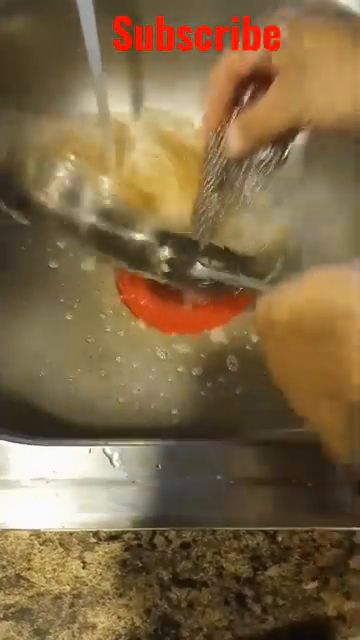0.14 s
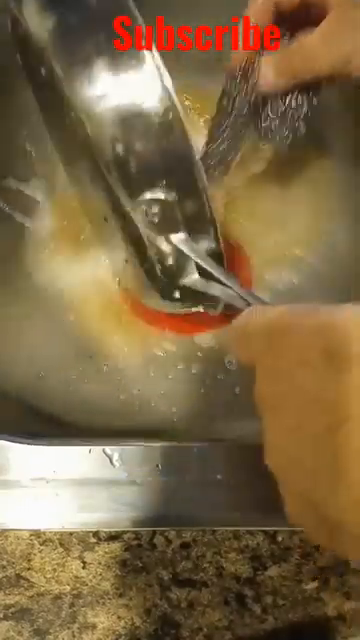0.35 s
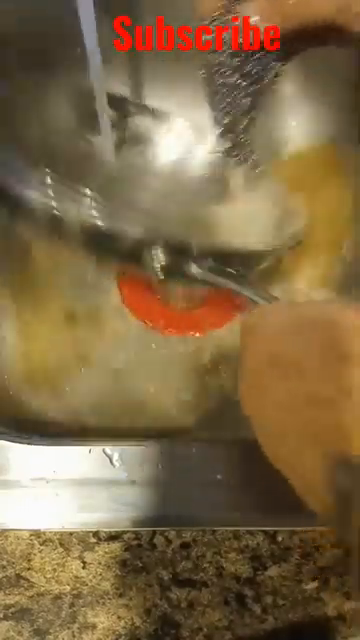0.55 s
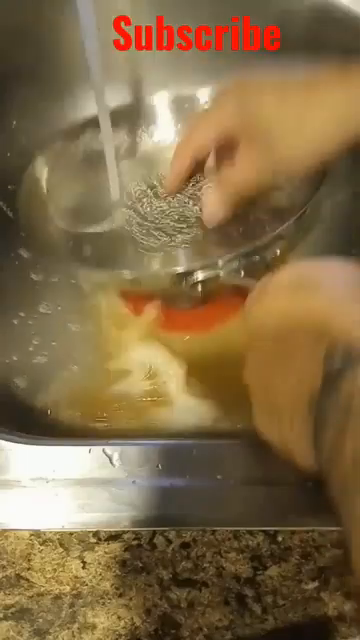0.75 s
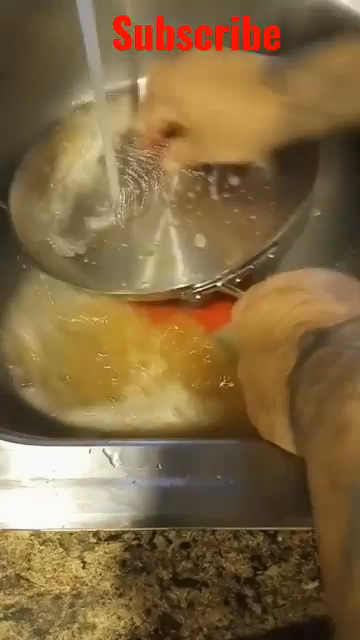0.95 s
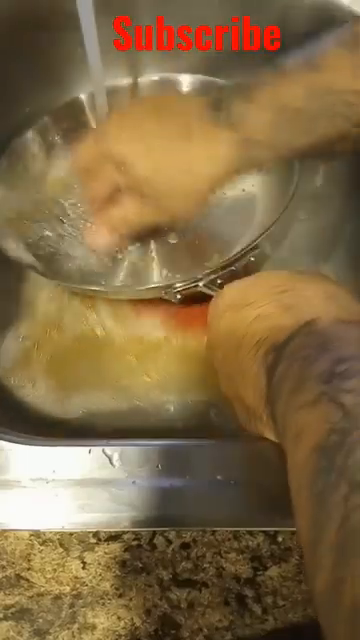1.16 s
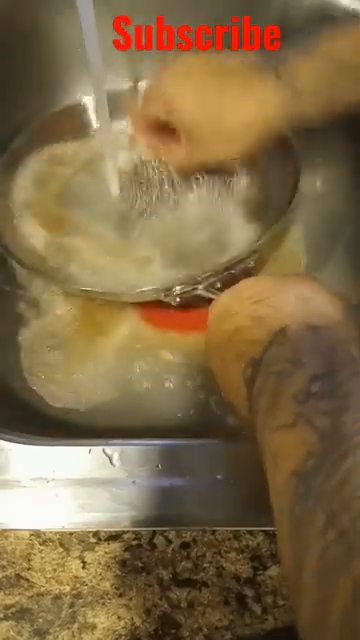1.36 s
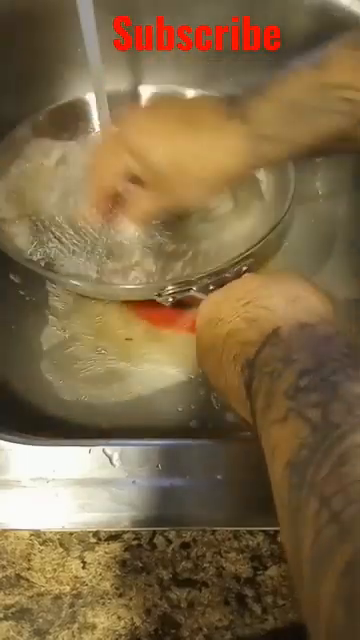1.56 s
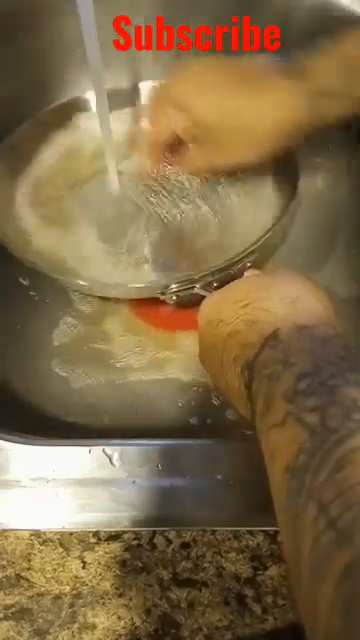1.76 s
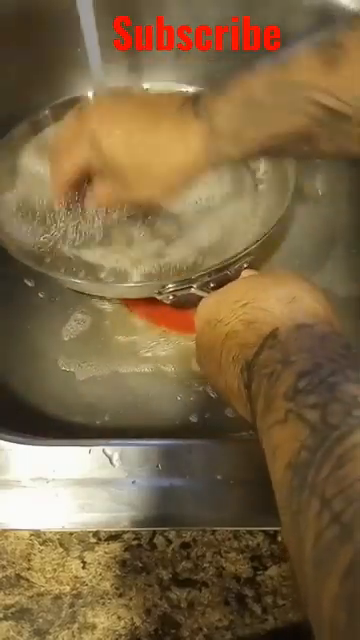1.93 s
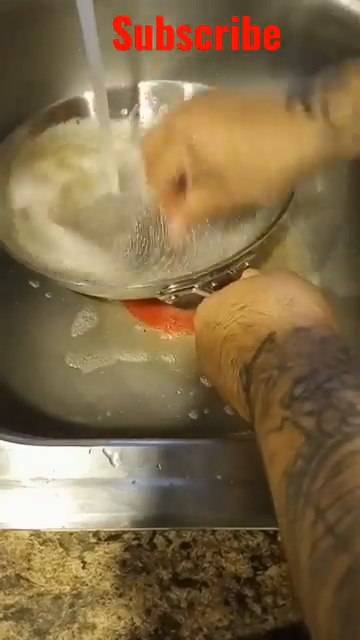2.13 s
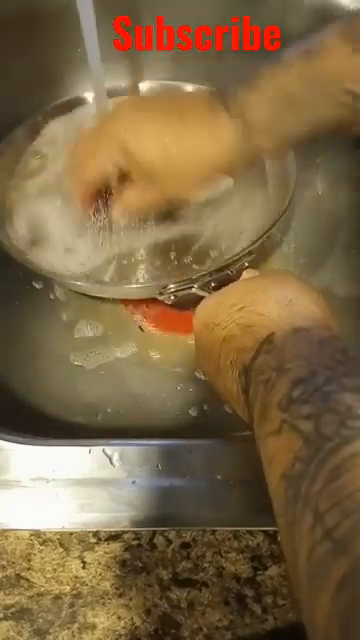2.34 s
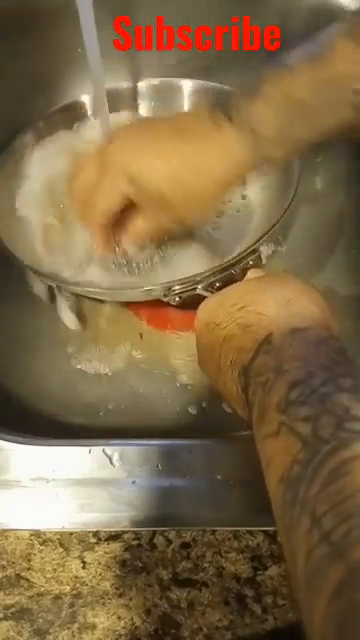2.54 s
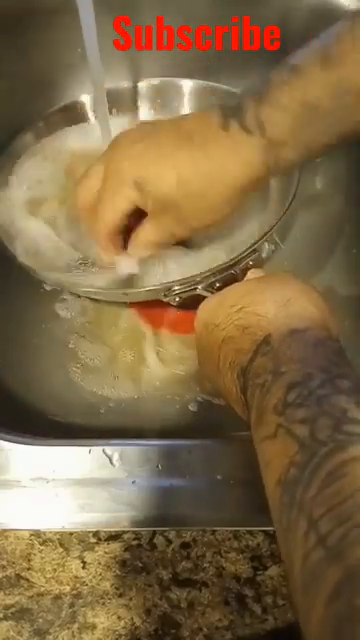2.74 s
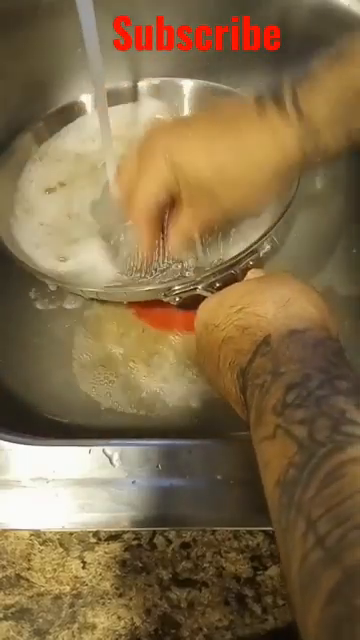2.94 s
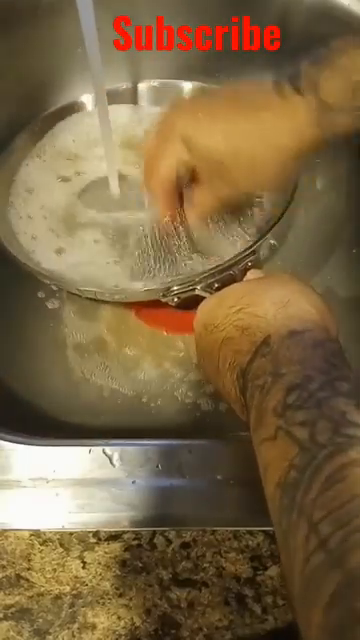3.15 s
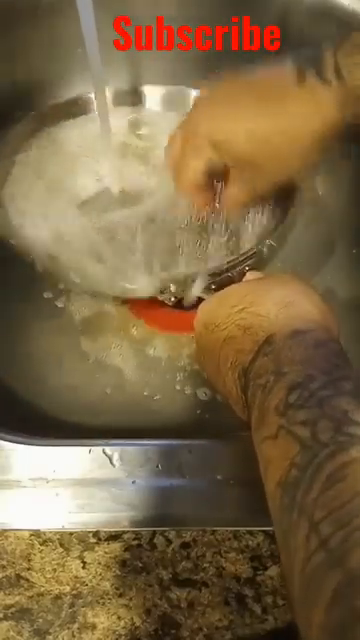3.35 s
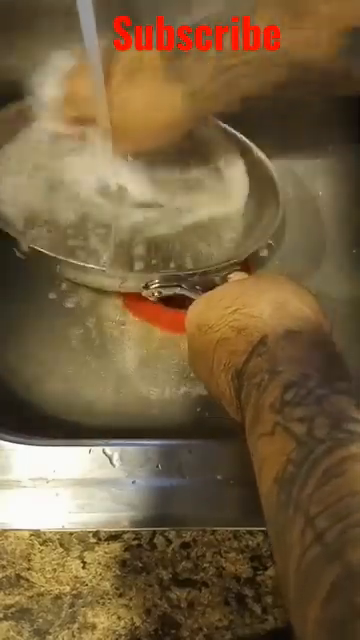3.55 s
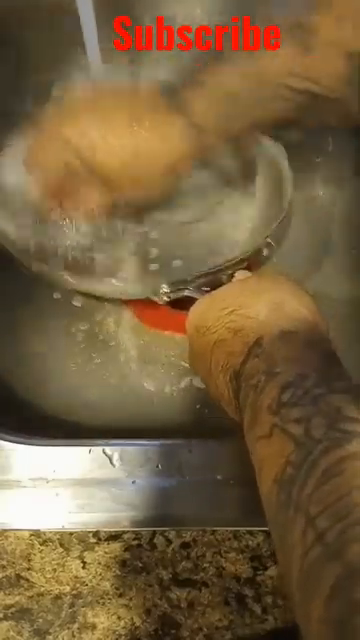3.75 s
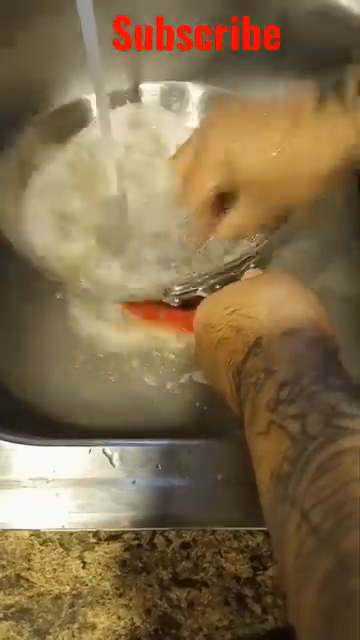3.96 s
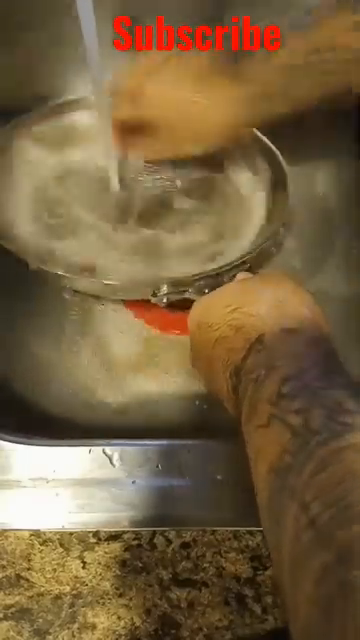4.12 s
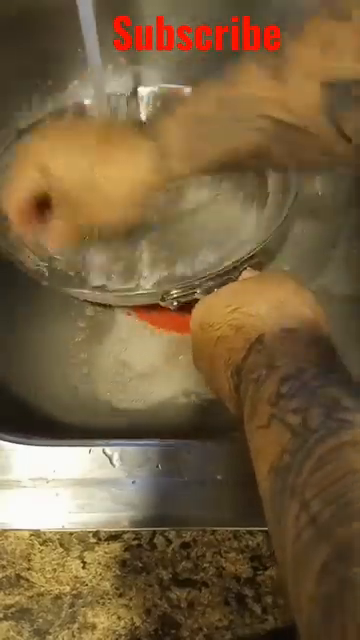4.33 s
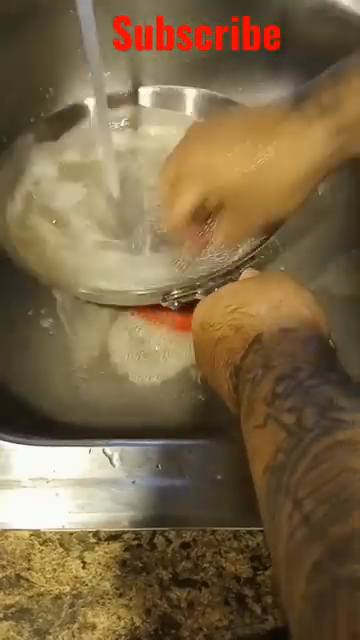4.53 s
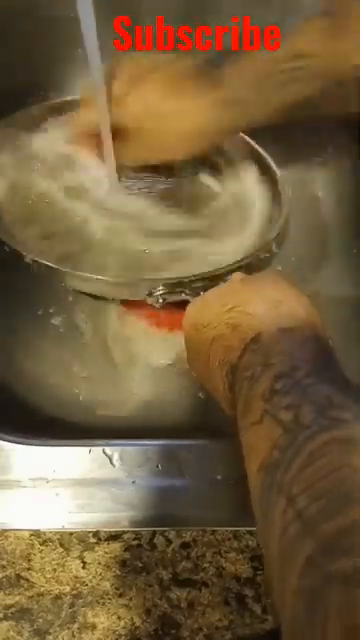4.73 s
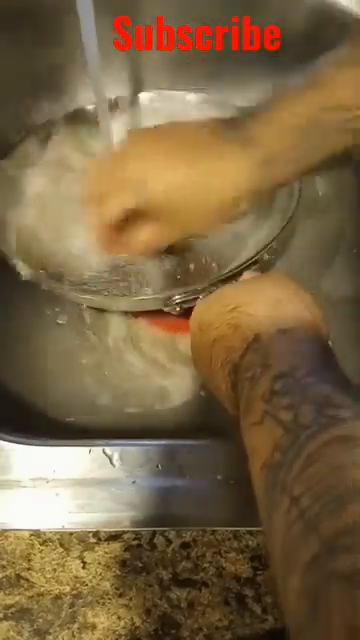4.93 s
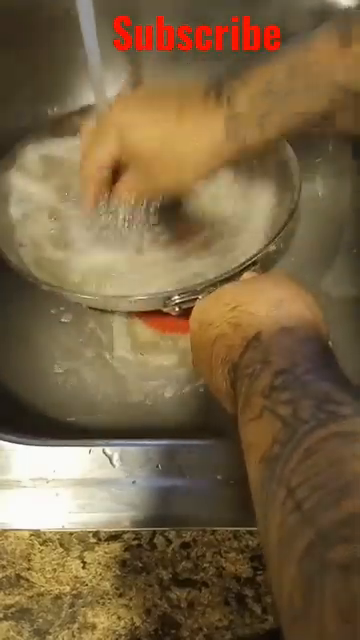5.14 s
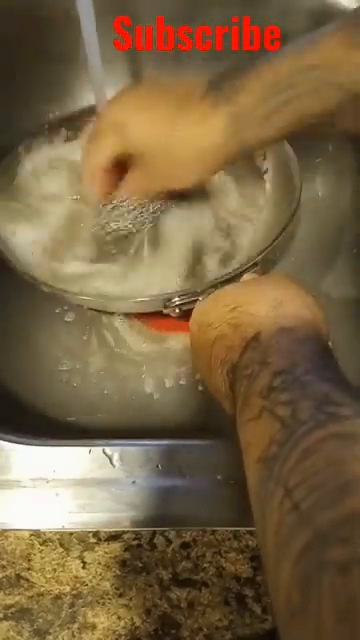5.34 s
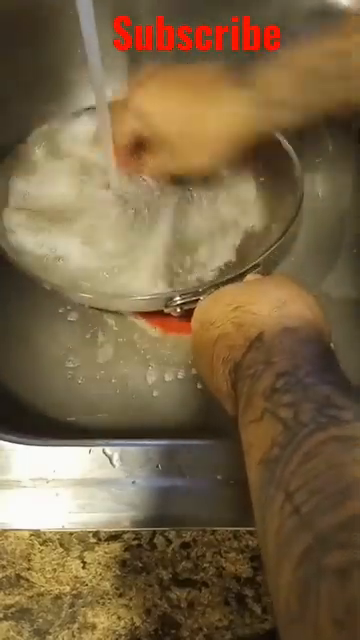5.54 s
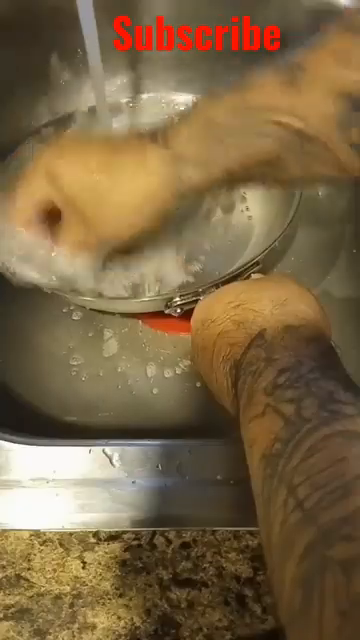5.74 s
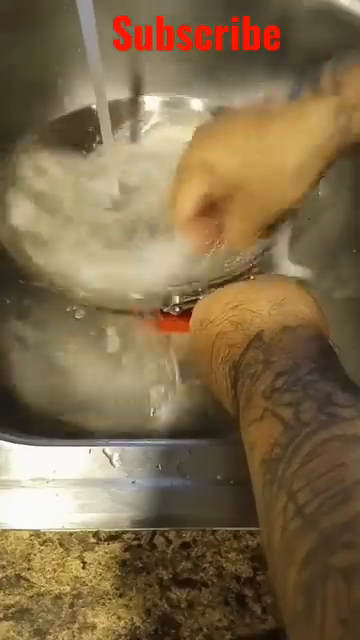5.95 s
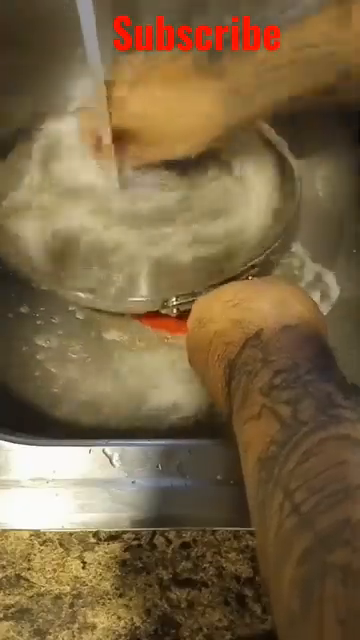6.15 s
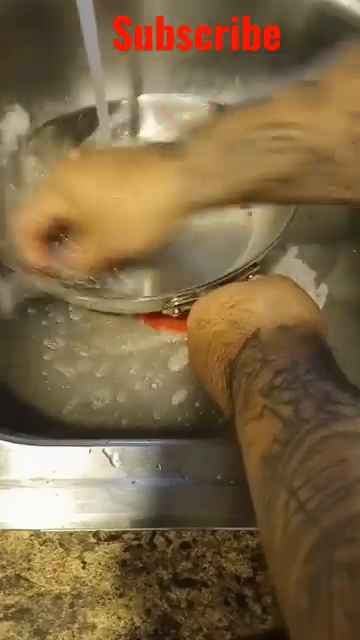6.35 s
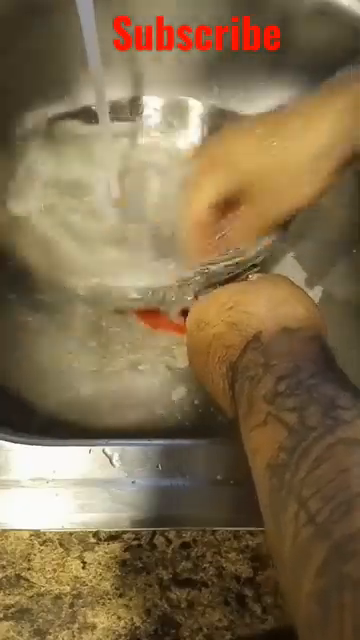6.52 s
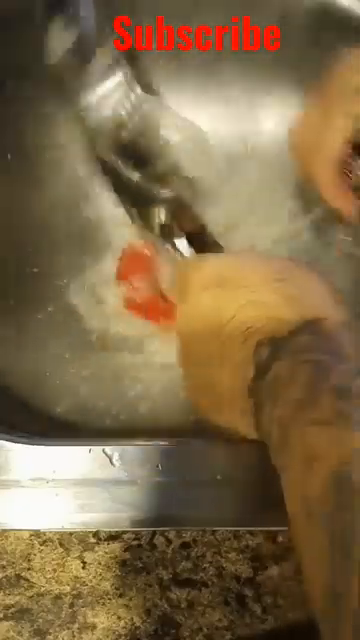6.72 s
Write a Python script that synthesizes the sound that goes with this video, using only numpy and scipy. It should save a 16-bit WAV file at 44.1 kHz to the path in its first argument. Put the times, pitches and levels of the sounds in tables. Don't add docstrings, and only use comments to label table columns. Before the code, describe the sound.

Metal links scrape briskly round a wet steel pan, ringing and hissing, while the pan knocks and skids on a hollow sink under running water.

```python
import sys
import numpy as np
from scipy import signal
from scipy.fft import rfft, irfft
from scipy.io import wavfile
from scipy.ndimage import uniform_filter1d

SR = 44100
rng = np.random.default_rng(int(sys.argv[2]) if len(sys.argv) > 2 else 0)


def int16_out(signal):
    q = np.round(np.clip(np.atleast_2d(signal).T, -1, 1) * 32767)
    wavfile.write(sys.argv[1], SR, q.astype(np.int16))


def amplitude_ratio(level_db):
    exponent = np.asarray(level_db, float) / 20
    return 10 ** exponent


N = 303614

# (t/s, thump level/dB, thump f/Hz, boom level/dB, clank level/dB)
KNOCKS = [(0.091, -33.5, 271, -33.5, -56), (0.326, -57, 204, -25.5, -56.5), (0.855, -18, 207, -17.5, -27),
          (1.094, -27, 267, -49, -42), (1.126, -19.5, 251, -34, -22.5), (1.628, -31.5, 280, -29, -44),
          (2.010, -31, 337, -27, -41), (2.574, -26, 290, -53, -69), (3.434, -48, 215, -45, -62),
          (3.568, -25.5, 308, -50, -41), (3.695, -24.5, 281, -26.5, -27), (3.99, -42, 290, -30.5, -48),
          (4.319, -28, 249, -25, -26.5), (4.519, -44, 263, -40, -44.5), (4.794, -29.5, 270, -53, -44),
          (4.88, -19, 276, -19, -23.5), (5.045, -16, 310, -36, -39), (5.3, -20.5, 239, -32, -39.5),
          (5.328, -24.5, 211, -39, -44.5), (5.8, -33, 270.3, -39, -54.5), (6.348, -12.5, 299, -16, -38),
          (6.404, -16, 306, -19.5, -30), (6.423, -17, 279, -24, -50)]
# (f/Hz, level/dB, t60/s)
FLOOR_MODES = [(203.4, -5.5, 0.4), (263.3, -6.5, 0.73), (278.3, 4.5, 0.28)]
BOOM_MODES = [(119.1, -4.5, 0.42), (130.7, 3.5, 0.27), (152.4, -3, 0.4)]
CLANK_MODES = [(505, -0.5, 0.3), (612.5, 1.5, 0.36), (705, 5.5, 0.17), (858, 8, 0.1), (947, -3.5, 0.24),
               (1210, -1, 0.056), (1313, 2, 0.16), (1504, 6, 0.045), (1850, -9, 0.11), (2286, -3, 0.2),
               (3023, 3, 0.032)]
# (f/Hz, level/dB, t60/s)
PAN_LOW = [(735, -4.5, 0.084), (876, -12.5, 0.38), (1194, 3.5, 0.071), (1306, -12, 0.17),
           (1415, -14.5, 0.095), (1765, 3, 0.13), (1890, 1, 0.13), (2217, -1, 0.054), (2523, 0, 0.076),
           (2760, -2.5, 0.15)]
PAN_HIGH = [(3164, -3, 0.14), (3914, -3, 0.043), (4130, -6.5, 0.18), (4460, 1.5, 0.027), (5025, 0, 0.067),
            (5390, -4, 0.11), (5800, -18, 0.21), (6010, -3, 0.093), (6160, -6, 0.05), (6480, -5, 0.044)]


def evened(x):
    return x / np.sqrt(np.mean(x ** 2) + 1e-20)


def read(points, hz):
    f, value = np.transpose(points)
    return np.interp(np.log(hz + 1), np.log(f + 1), value)


def controls(rows):
    s, *columns = np.transpose(rows)
    return [np.interp(np.arange(N) / SR, s, c) for c in columns]


def peaks_db(rows):
    t, out = np.arange(0, N, 32) / SR, 0
    for s, db, rise, fall in rows:
        growth = 1 + (t - s) / max(rise, .005)
        decay = 1 - (t - s) / max(fall, .005)
        out = np.maximum(out, db * np.minimum(growth, decay))
    return np.interp(np.arange(N) / SR, t, out)


def add(mix, s, sound):
    part = mix[round(s * SR):][:len(sound)]
    part += sound[:len(part)]


def ring(modes, gains, size=20000):
    t = np.arange(size) / SR
    return sum(g * amplitude_ratio(db - 60 * t / t60) * np.sin(2 * np.pi * hz * t)
               for g, (hz, db, t60) in zip(gains, modes))


def hiss(spectrum, patchy_db, flicker_db):
    frames, hz = N // 128 + 5, np.fft.rfftfreq(512, 1 / SR)
    a, b, c, d, patches = rng.standard_normal((frames, 257, 5)).T
    patches = uniform_filter1d(patches, size=6, axis=0)
    patches = evened(uniform_filter1d(patches, size=16, axis=1))
    flicker = evened(uniform_filter1d(rng.standard_normal(frames), size=4))
    level_db = read(spectrum, hz)[:, None] + patchy_db * patches + flicker_db * flicker
    z = np.array([a + 1j * b, c + 1j * d]) * amplitude_ratio(level_db)
    return evened(signal.istft(z, nperseg=512, noverlap=384)[1][:, :N])


def ticks(per_s, spread_db):
    sign = rng.choice([-1., 1.], N) * (rng.random(N) < per_s / SR)
    return sign * amplitude_ratio(spread_db * np.minimum(rng.exponential(1, N), 5))


def excited(modes, per_s, spread_db, roam_db, wander):
    out, frames = np.zeros((2, N)), N // 1000 + 2
    at = np.arange(N) / 1000
    roam = evened(uniform_filter1d(rng.standard_normal((frames, len(modes))), size=5, axis=0))
    contacts = np.array([ticks(per_s, spread_db) for port in out])
    signs = rng.choice([-1, 1], (len(modes), 2, 1))
    for (hz, db, t60), r, sign in zip(modes, roam.T, signs):
        sag = np.interp(at, np.arange(frames), wander * r[::-1])
        turn = np.exp(2j * np.pi * hz * np.cumsum(1 + sag) / SR)
        drive = contacts * np.interp(at, np.arange(frames), amplitude_ratio(db + roam_db * r))
        decayed = signal.lfilter([1], [1, -amplitude_ratio(-60 / t60 / SR)], drive * turn.conj() + 1e-18)
        out += sign * (turn * decayed).imag
    return evened(out)


def scrub():
    # (t/s, scratch level/dB, pan ring share/dB)
    contact = [(0.0, -56, -2.5), (.4, -59, 2.5), (.5, -56, -5), (.835, -58.5, -3.5), (.86, -42.5, 6.5),
               (1.4, -47, 1.5), (1.86, -46, -1.5), (2.22, -46.5, -6.5), (2.4, -42, -7), (3.05, -43, -7),
               (3.33, -45.5, -11), (3.85, -49.5, -2.5), (4.44, -47, -7.5), (4.7, -46, -10),
               (5.17, -47, -3.5), (5.6, -46.5, -7), (6.4, -48.5, -9), (6.88, -45, -9.5)]
    # (hardest t/s, extra pressure level/dB, rise/s, fall/s)
    strokes = [(0.0, 3.5, .05, 0.12), (.15, 3, .06, 0.024), (.31, 5, 0.13, 0.14), (.88, 18, 0.056, 0.18),
               (1.09, 6, 0.13, 0.031), (1.3, 6.5, 0.037, 0.085), (1.53, 8, .06, 0.17),
               (1.88, 0, 0.023, 0.09), (2.1, 3.5, 0.22, 0.13), (2.83, 3.5, 0.069, .05),
               (3.2, 4, 0.045, 0.08), (3.37, 3.5, 0.024, 0.11), (3.455, 5.5, .1, 0.028),
               (3.56, 2.5, .07, .1), (3.7, 4, 0.082, .05), (3.97, 3.5, .1, .09), (4.29, 3.5, 0.18, 0.12),
               (4.81, 2, 0.08, .06), (4.88, 6, 0.008, 0.045), (5.07, 3.5, .08, .09), (5.26, 5, 0.076, 0.14),
               (5.495, 2.5, 0.082, 0.15), (5.7, 8, 0.094, 0.13), (6.07, 6.5, .11, 0.076),
               (6.3, 7, 0.13, 0.044), (6.73, 5, 0.21, 0.099)]
    # (t/s, low rings level/dB, high rings level/dB)
    choke = [
        (0, -2, -12),
        (.8, -14, -10),
        (.9, -0.5, -3),
        (1.3, 2.5, -1.5),
        (1.8, 0, -6),
        (2.4, -2, -5.5),
        (3.3, -2.5, -8.5),
        (4.5, -6, -8),
        (6.88, -10.5, -8.5),
    ]
    # (f/Hz, level/dB per Hz)
    scratch_spectrum = [(1290, -77), (2200, -11), (2530, -6), (3360, -3.5), (3570, 0), (4280, -5),
                        (4650, 1), (5990, 1.5), (7190, -6.5), (9000, -10.5), (11700, -30), (19800, -120)]
    spray_spectrum = [(4120, -38), (7000, 0.5), (8380, -1.5), (10600, 3.5), (13500, 1), (14900, 8.5),
                      (15800, -0.5)]
    wash_spectrum = [(410, -7), (700, -1), (987, -3.5), (1570, 3), (1760, 3), (2100, 2), (3500, -8),
                     (4550, -0.5), (7700, -120)]
    ring_follow, spray_follow, spray_db = 0.28, 0.7, -0.22

    (rest_db, ring_db), press_db = controls(contact), peaks_db(strokes)
    low_db, high_db = controls(choke)
    scratch = amplitude_ratio(high_db) * excited(PAN_HIGH, 1200, 3.0, 3.5, .006) + hiss(scratch_spectrum, 2.2, 0.36)
    rings = amplitude_ratio(low_db) * excited(PAN_LOW, 600, 2.9, 4.3, .008) + hiss(wash_spectrum, 4.36, 0.65)
    scratch /= np.sqrt(1 + amplitude_ratio(2 * high_db))
    rings /= np.sqrt(1 + amplitude_ratio(2 * low_db))
    slips = uniform_filter1d(uniform_filter1d(rng.standard_normal(N), size=400), size=200)
    slips_db = 0.98 * evened(slips)
    spray = amplitude_ratio(spray_db + spray_follow * press_db) * hiss(spray_spectrum, 1.66, 0.44)
    ringing = amplitude_ratio(rest_db + ring_db + ring_follow * press_db) + shaken()
    return amplitude_ratio(3.0 + slips_db) * (amplitude_ratio(rest_db) * (amplitude_ratio(press_db) * scratch + spray) + ringing * rings)


def shaken():
    shaken_db, shaken_t60_s = -14, 0.2
    out, t = np.zeros(N), np.arange(20000) / SR
    for row in KNOCKS:
        dying = amplitude_ratio(row[-1] + shaken_db - 60 * t / shaken_t60_s)
        add(out, row[0], dying * np.minimum(t / 0.0059, 1))
    return out


def knocks():
    thump_t60_s, light_ring, boom_ring = 0.055, 0.63, 0.43
    # (f/Hz, level/dB, t60/s)
    landing_modes = [(153, 5.5, 0.11), (187, 7, 0.061), (274, -2, 0.16), (721, -6, 0.18), (1203, -24, 0.3),
                     (1476, -5, 0.043), (1897, -26, .23), (646, -14, .2), (2830, -24, 0.31)]
    landing_s, landing_db = .8372, -13.5

    out, chance = np.zeros((2, N)), rng.uniform(0.034, 1, (len(KNOCKS), 2, 24))
    signs, detune = rng.choice([-1, 1], (len(KNOCKS), 2, 24)), rng.uniform(-1.044, 1, (len(KNOCKS), 24))
    blow, t = np.hanning(round(0.0013 * SR)), np.arange(20000) / SR
    rattle_band = signal.butter(2, [420 / SR * 2, 1000 / SR * 2], "bandpass")
    for (s, thump_db, hz, boom_db, clank_db), c, sign, d in zip(KNOCKS, chance, signs, detune):
        t60 = thump_t60_s * (amplitude_ratio(-light_ring * (thump_db + 25)) + amplitude_ratio(boom_ring * (boom_db + 13)))
        thump = ring([(hz, 1.5, max(t60, .02))], [1]) + amplitude_ratio(-15.5) * ring(FLOOR_MODES, c[0])
        boom = ring(BOOM_MODES, .5 + .5 * c[0, 4:])
        low = np.convolve(amplitude_ratio(thump_db) * thump + amplitude_ratio(boom_db - 7.5) * boom, blow / blow.sum())
        shifted = [(f * (1 + 0.063 * e), db, decay) for (f, db, decay), e in zip(CLANK_MODES, d)]
        onset = np.minimum(t / .002 * amplitude_ratio(.6 * (clank_db + 25)), 1)
        for port in range(2):
            crack = rng.standard_normal(len(t)) * amplitude_ratio(-9.0 - 60 * t / 0.05)
            rattle = rng.standard_normal(len(t)) * amplitude_ratio(15 - 60 * t / 0.27)
            clank = ring(shifted, (c * sign)[port, 8:]) + signal.lfilter([.3], [1, -.7], crack)
            clank += signal.lfilter(*rattle_band, rattle)
            add(out[port], s, low[:len(clank)] + amplitude_ratio(clank_db - 5.0) * clank * onset)
    landing = np.minimum(t / 0.0055, 1) * ring(landing_modes, np.ones(len(landing_modes)))
    for port in out:
        add(port, landing_s, amplitude_ratio(landing_db) * landing)
    return out


def drag():
    # (loudest t/s, drag level/dB, upper share/dB, build-up/s)
    drags = [(0.0, -51, -14, 0.12), (.76, -54, -16, 0.077), (1.0, -29, -12, 0.27), (1.21, -37, -6, 0.48),
             (2.14, -54, -30, .4), (3.62, -40.5, -12, 0.13), (3.81, -40.5, -1.5, .2),
             (3.949, -40, -1.5, 0.15), (4.22, -38.5, -15.5, 0.051), (4.39, -32, -14, 0.29),
             (4.56, -47, 2, .1), (4.95, -30.5, -10, .25), (5.37, -48, 2, 0.13), (6.07, -53, -12, .08),
             (6.48, -31, -12.5, 0.25), (6.66, -49.5, -25, .1)]
    rest_db, fall_db_per_s = -63.5, 141
    skids = [(s, db - rest_db, rise, (db - rest_db) / fall_db_per_s) for s, db, upper, rise in drags]
    level_db = rest_db + peaks_db(skids)
    upper_db, = controls([(row[0], row[2]) for row in drags])
    murmuring = FLOOR_MODES + BOOM_MODES + [(339, -1.5, 0.089), (347, 10, 0.12), (414, 0, 0.1)]
    low = excited(murmuring, 400, 2.34, 4.3, .012).sum(0)
    return amplitude_ratio(level_db - 4) * (low + amplitude_ratio(upper_db) * excited(CLANK_MODES[:6], 400, 6.8, 2.8, .02))


def slaps():
    # (t/s, peak level/dB)
    bundle_hits = [(1.1273, -16.5), (1.2908, -29), (1.5189, -32.5), (2.2905, -32), (2.7825, -50),
                   (2.822, -32.5), (3.1818, -30.5), (3.355, -37), (3.4294, -52), (3.694, -27),
                   (4.8773, -21)]
    out, modes, t = np.zeros((2, N)), PAN_LOW + PAN_HIGH, np.arange(8000) / SR
    bright = signal.butter(2, [1000 / SR * 2, 3000 / SR * 2], "bandpass")
    for s, db in bundle_hits:
        for port in out:
            strikes = rng.standard_normal(700) * (rng.random(700) < .03) * amplitude_ratio(-60 * t[:700] / 0.041)
            pan = ring(modes, rng.standard_normal(len(modes)), size=len(t)) * amplitude_ratio(-60 * t / .4)
            body = signal.oaconvolve(strikes, pan)[:len(t)]
            crack = signal.lfilter(*bright, rng.standard_normal(len(t)) * amplitude_ratio(-60 * t / 0.09))
            add(port, s, amplitude_ratio(db - 21) * body + amplitude_ratio(db + 2.5) * crack)
    return out


def flecks():
    # (t/s, peak level/dB, f/Hz, left-right level/dB)
    flicks = [(1.2311, -26, 1700, 0.5), (1.2895, -25, 3200, 3.5), (1.5005, -26, 5970, 3.5),
              (1.8662, -33, 4640, -0.5), (2.7811, -30, 5910, 3.0), (3.1842, -27, 3610, 6.0),
              (3.4311, -29, 6160, 4.0), (3.6945, -24, 1920, 0.0), (4.3166, -26, 1500, 1.5),
              (4.8774, -21, 2130, -1.5), (5.0619, -28, 5680, 5.0), (6.0153, -31, 4610, 4.5),
              (6.348, -35, 1730, 1.5), (6.4029, -32, 1650, 2.0), (6.6848, -30, 6100, 5.5)]
    out = np.zeros((2, N))
    for s, db, hz, pan_db in flicks:
        pair = [(hz, 0, .09), (hz * 1.04, -7, .04)]
        for port, side in zip(out, (1, -1)):
            add(port, s, amplitude_ratio(db - 9 + side * pan_db / 2) * ring(pair, [1, side], size=5000))
    return out


def jingles():
    # (t/s, peak level/dB, f/Hz)
    clusters = [
        (0.1303, -37, 5040),
        (0.1497, -45, 4800),
        (0.2344, -37, 5040),
        (0.259, -43, 4820),
        (0.2893, -38, 5920),
        (0.3185, -41.5, 5960),
    ]
    out = np.zeros((2, N))
    for s, db, hz in clusters:
        tone = ring([(hz, 0, .06), (hz * 1.03, -4, .05)], [1, 1], size=3000)
        for port in out:
            strikes = rng.standard_normal(1200) * (rng.random(1200) < .006)
            add(port, s, amplitude_ratio(db - 9) * np.convolve(strikes, tone))
    return out


def wall():
    # (t/s, level/dB, f/Hz, free time/s)
    tones = [(1.635, -18.5, 347, 0.035), (1.695, -31, 335, 0.026), (2.027, -23.5, 338.3, 0.036),
             (2.072, -31, 341, 0.045), (3.569, -26.5, 330, 0.12), (3.7, -15.5, 350, 0.036),
             (3.773, -33, 349, 0.078), (3.942, -36.5, 347, 0.036), (4.184, -32, 333, 0.081),
             (4.316, -18.5, 359.6, 0.026), (4.344, -20, 340, 0.022), (4.395, -23, 339, 0.023),
             (4.794, -32, 333.4, 0.086), (4.882, -15, 361, 0.079), (6.349, -20.5, 328.5, 0.038),
             (6.402, -25, 315.6, 0.092), (6.424, -25, 328, 0.055)]
    out, t = np.zeros(N), np.arange(20000) / SR
    for s, db, hz, free in tones:
        settled = np.clip((t - free) / 0.011, 0, 1)
        shape = (1 - np.exp(-t / .007)) * amplitude_ratio(-22 * settled)
        add(out, s, amplitude_ratio(db - 1.5) * shape * ring([(hz, 0, .45), (hz - 14, -9, .3)], [1, -1]))
    return out


def bumps():
    # (t/s, peak level/dB, f/Hz, t60/s)
    thuds = [(.725, -44, 255, .08), (.78, -43, 255, .1), (.858, -27, 1200, .26), (.86, -26, 1895, .22),
             (.86, -29, 3225, .09), (.862, -29, 2800, .3), (.905, -32, 3800, .2), (1.135, -36, 460, .3),
             (1.66, -28, 345, .12), (1.68, -38, 200, .15), (3.72, -38, 850, .4), (4.321, -31, 1300, .12),
             (4.323, -32, 1480, .1), (4.33, -32, 900, .18), (4.885, -20, 361, .1), (5.81, -49, 1080, .3),
             (6.44, -24, 290, .2), (3.9905, -14, 300, .035), (4.518, -23, 270, .04),
             (6.09, -48, 610, .4), (1.632, -26, 345, .07), (1.81, -40, 270, .08), (2.017, -33, 430, .06),
             (2.03, -34, 520, .09), (2.052, -37, 490, .08), (2.068, -36, 525, .09), (2.1, -40, 590, .07),
             (2.365, -43, 250, .07), (3.708, -22, 355, .08), (3.948, -32, 300, .05),
             (3.962, -33, 320, .05), (4.535, -28, 240, .04), (4.884, -23, 730, .08),
             (4.9, -27, 880, .09), (5.309, -28, 440, .04), (5.327, -25, 400, .04),
             (5.343, -28, 300, .04), (5.352, -31, 250, .04), (5.374, -31, 240, .06),
             (5.436, -40, 250, .05)]
    out, t = np.zeros(N), np.arange(6000) / SR
    for s, db, hz, t60 in thuds:
        add(out, s, amplitude_ratio(db) * np.minimum(t / .002, 1) * ring([(hz, 0, t60)], [1], size=6000))
    return out


def sway():
    # (t/s, peak level/dB)
    pushes = [(0.094, -42), (0.327, -44), (0.837, -43), (0.949, -35), (1.126, -32), (1.629, -40),
              (2.01, -38), (2.26, -45), (2.571, -42), (2.931, -53), (3.439, -42), (3.693, -41),
              (3.998, -31), (4.317, -45), (4.514, -55.5), (4.877, -36), (5.046, -34), (5.299, -50),
              (5.359, -50), (5.8, -34), (6.07, -57), (6.346, -44), (6.403, -50), (6.629, -54)]
    sway_hz = 67.4
    out, t = np.zeros(N), np.arange(20000) / SR
    for s, db in pushes:
        add(out, s, amplitude_ratio(db + 2.5) * (1 - np.exp(-t / 0.017)) * ring([(sway_hz, 0, .3)], [1]))
    return out


def slops():
    # (loudest t/s, level/dB, bubble f/Hz, half length/s)
    swarms = [(.42, -56, 1100, .07), (1.68, -48, 900, .03), (2.07, -44, 520, .07), (2.1, -46, 215, .1),
              (3.81, -48, 1350, .04), (3.97, -42, 1250, .07), (4.36, -42, 600, .06), (4.6, -54, 640, .07),
              (4.82, -48, 900, .05), (5.32, -44, 850, .06), (5.5, -52, 1200, .06), (5.72, -50, 900, .08),
              (5.9, -54, 1000, .07), (6.25, -52, 1000, .05), (6.68, -55, 1100, .08)]
    pitch_spread, cycles, pitch_rise = .2, 11., .12
    out, t = np.zeros((2, N)), np.arange(1500) / SR
    chance = rng.standard_normal((len(swarms), 40, 4))
    for (s, db, hz, half), swarm in zip(swarms, chance):
        for when, pitch, big, pan in swarm:
            f = hz * np.exp(pitch_spread * pitch)
            u = f * t / cycles
            tone = np.sin(2 * np.pi * f * t * (1 + pitch_rise * u))
            bubble = amplitude_ratio(db + 3.5 * big) * u * np.exp(1 - 3 * u) * tone
            for port, side in zip(out, (1, -1)):
                add(port, s + half * when / 2, bubble * amplitude_ratio(3.0 * side * pan))
    return out


def stream():
    # (f/Hz, level/dB per Hz)
    tap_spectrum = [(24, -75), (40, -45), (85, -6), (112, -8), (171, -31), (225, 9.5), (353, -5.5),
                    (390, 7), (582, -36), (2360, -38), (3110, -3), (3890, -17), (15800, -29)]
    tap_db = -51
    return amplitude_ratio(tap_db - 12.0) * hiss(tap_spectrum, 1.2, 0.88)


def kitchen(x):
    # (f/Hz, t60/s)
    room_decay = [(100, 0.34), (1000, 0.43), (8000, 0.055)]
    taps = np.zeros((2, SR // 2))
    at = np.arange(200, SR // 2 - 20, 20) + rng.integers(0, 20, (2, (SR // 2 - 201) // 20))
    np.put_along_axis(taps, at, rng.choice([-1., 1.], at.shape), 1)
    hz, t, z = signal.stft(taps, SR, nperseg=256)
    tail = signal.istft(z * amplitude_ratio(-60 * t / read(room_decay, hz)[:, None]), SR, nperseg=256)[1]
    return signal.fftconvolve(x, tail / np.linalg.norm(tail[0]), axes=1)[:, :N]


def scene():
    hits, hum = knocks() + slaps(), wall() + bumps()
    steady = drag() + scrub() + stream()
    tail = amplitude_ratio(-11.5) * kitchen(hits + amplitude_ratio(-8) * hum)
    return hits + hum + tail + sway() + jingles() + steady + slops() + flecks()


def gain_control(dry):
    from_db, share, back_db_per_s = -22, 0.13, 62
    power_db = 10 * np.log10(abs(uniform_filter1d((dry ** 2).mean(0), size=600)) + 1e-12)
    back = np.arange(N) * back_db_per_s / SR
    held_db = np.maximum.accumulate(power_db + back) - back
    over_db = np.maximum(held_db - from_db, 0)
    return dry / amplitude_ratio(share * uniform_filter1d(over_db, size=400))


def band_limit(x):
    return signal.sosfilt(signal.butter(12, 15790, fs=SR, output="sos"), x)


def record(dry):
    # (f/Hz, coherence)
    likeness = [(60, 0.62), (300, 0.93), (700, 0.53), (1500, 0.29), (4000, 0.025), (15000, 0.015)]
    # (f/Hz, level/dB)
    balance = [(60, -2), (180, 3), (550, 1.5), (1650, 0), (4970, 4), (15000, -1)]
    hz, (left, right) = np.fft.rfftfreq(N, 1 / SR), rfft(gain_control(dry))
    blend = np.arcsin(np.clip(0.99 * read(likeness, hz), 0, 1)) / 2
    lean = amplitude_ratio(read(balance, hz) / 2)
    lead = np.exp(2j * np.pi * hz * .00011)
    z = [(np.cos(blend) * left + np.sin(blend) * right) * lean * lead,
         (np.cos(blend) * right + np.sin(blend) * left) / lean]
    slope = 1j * hz / 63
    band = (slope ** 2 / (slope ** 2 + np.sqrt(2) * slope + 1)) ** 2
    edge = hz < 15780
    return band_limit(irfft(np.array(z) * band * edge, N))


dry = scene()
out = record(dry)
int16_out(out)
```